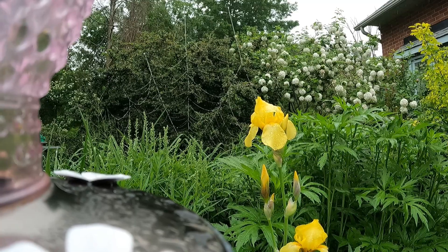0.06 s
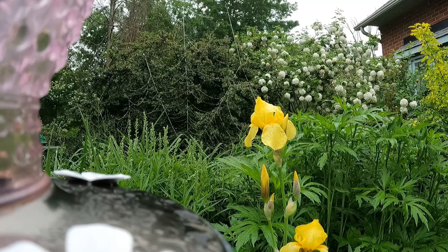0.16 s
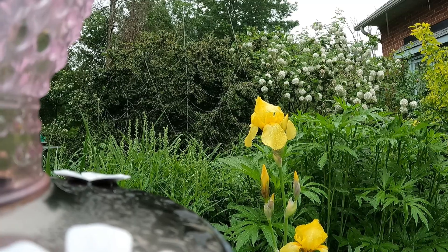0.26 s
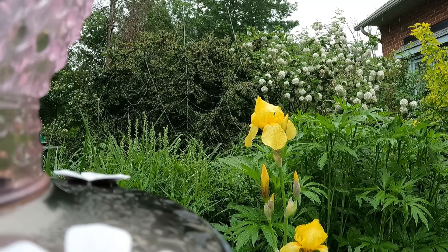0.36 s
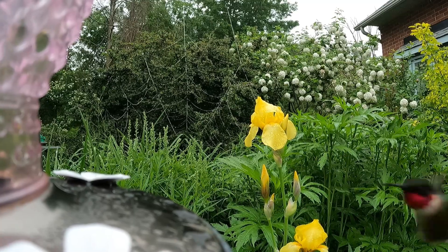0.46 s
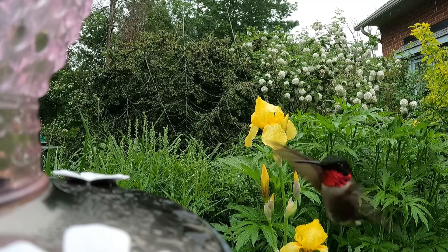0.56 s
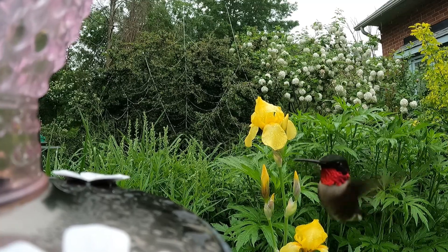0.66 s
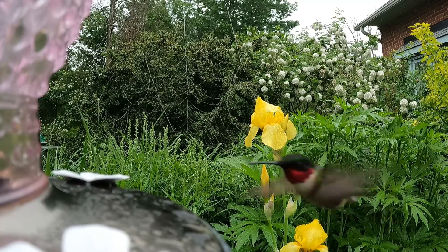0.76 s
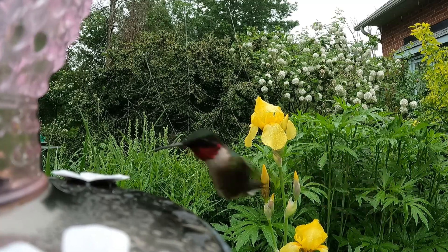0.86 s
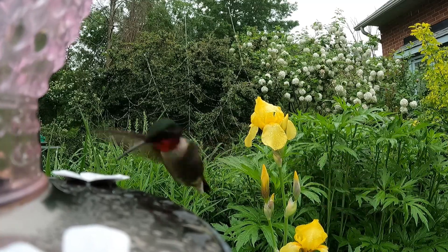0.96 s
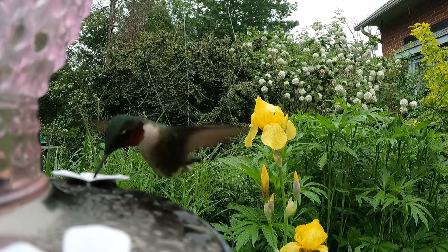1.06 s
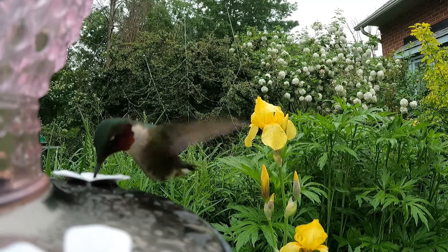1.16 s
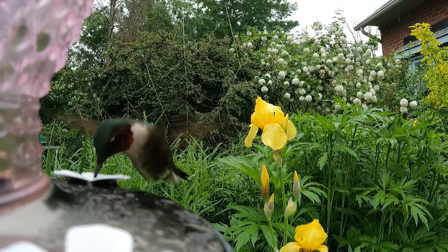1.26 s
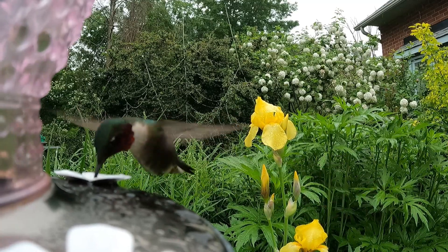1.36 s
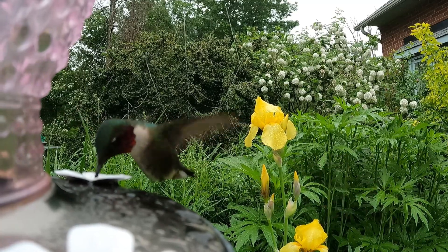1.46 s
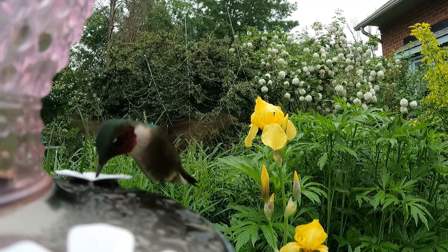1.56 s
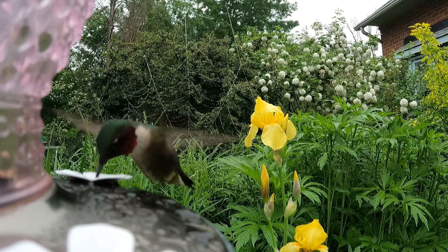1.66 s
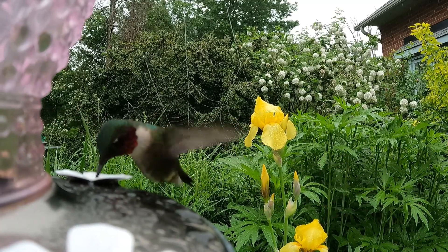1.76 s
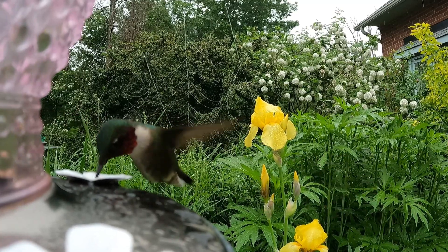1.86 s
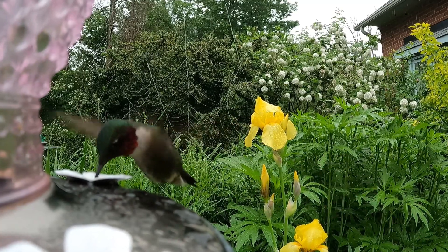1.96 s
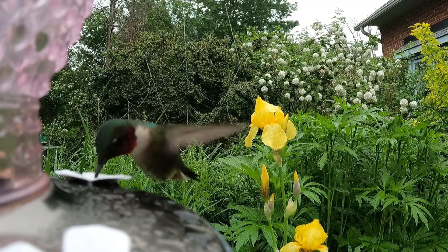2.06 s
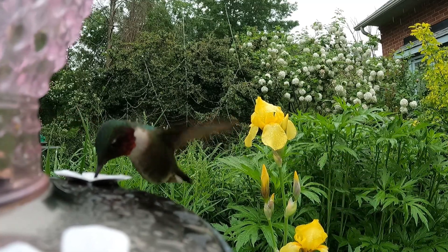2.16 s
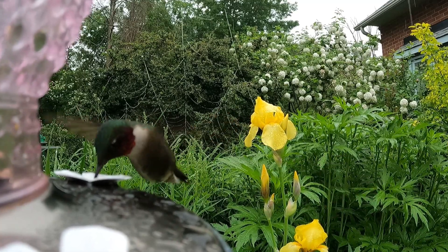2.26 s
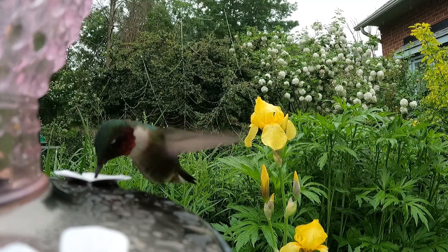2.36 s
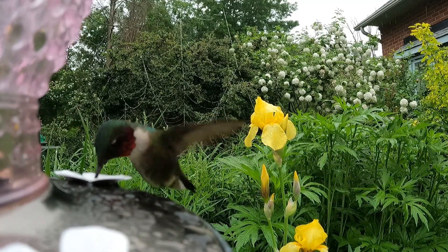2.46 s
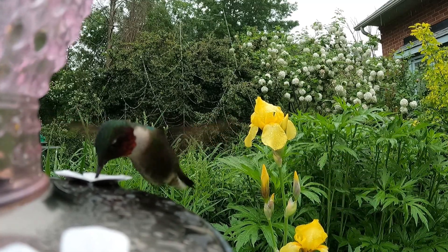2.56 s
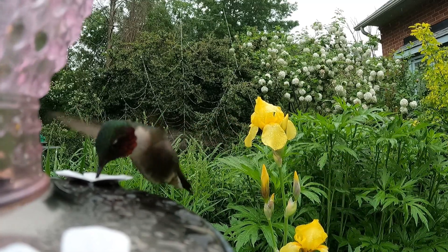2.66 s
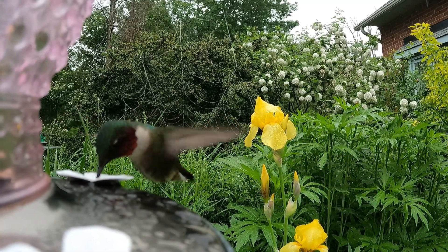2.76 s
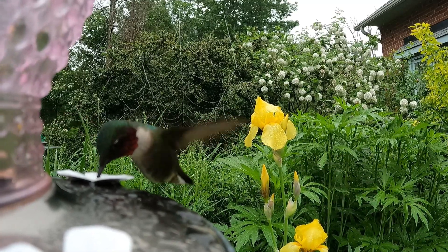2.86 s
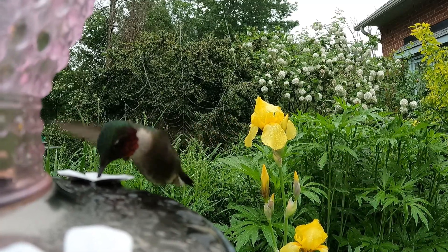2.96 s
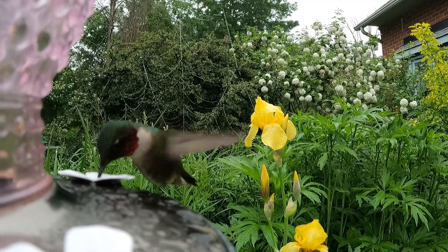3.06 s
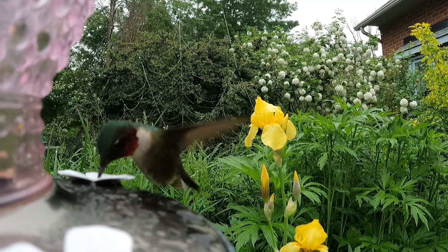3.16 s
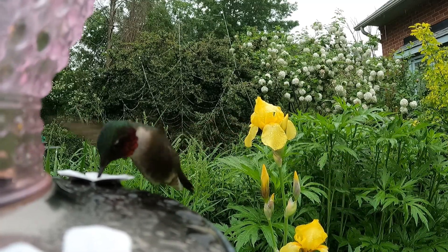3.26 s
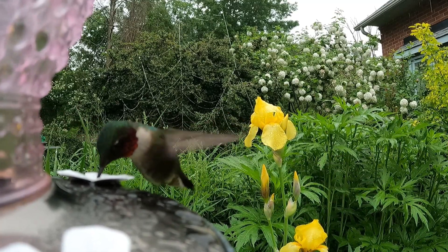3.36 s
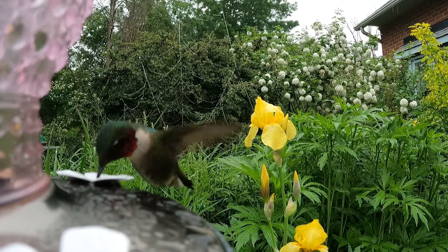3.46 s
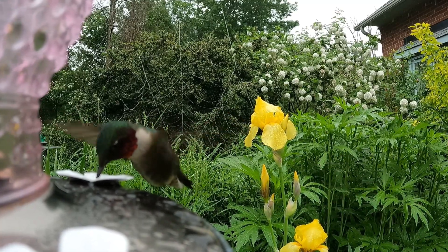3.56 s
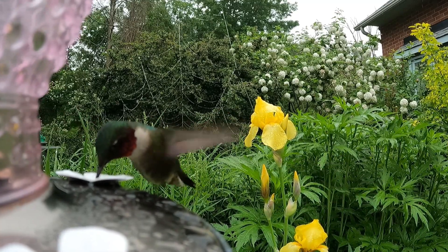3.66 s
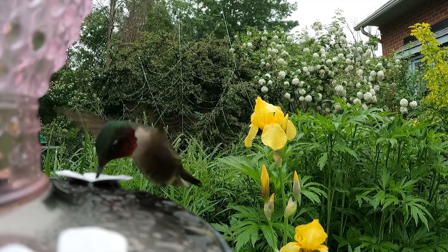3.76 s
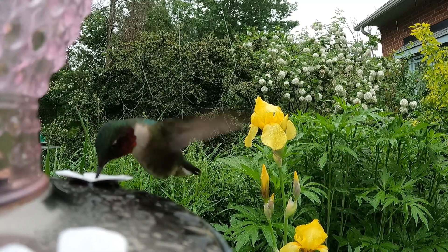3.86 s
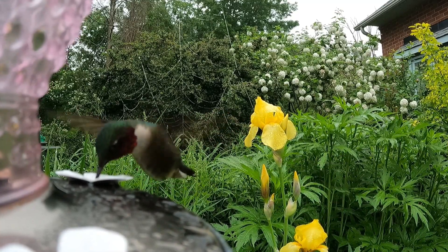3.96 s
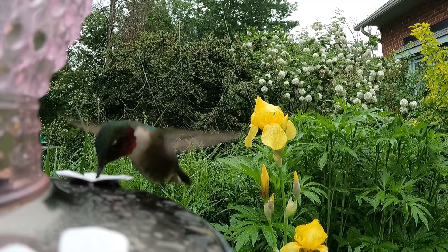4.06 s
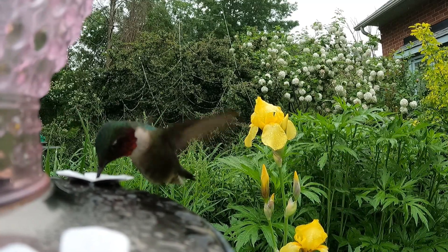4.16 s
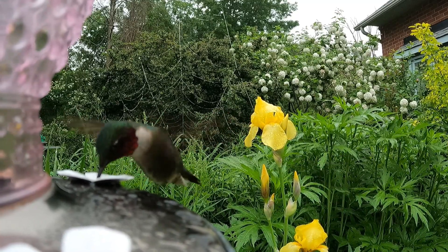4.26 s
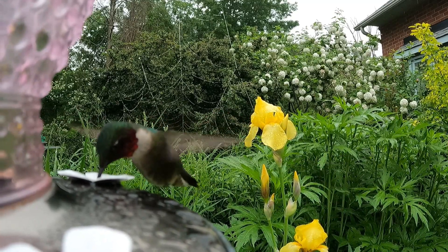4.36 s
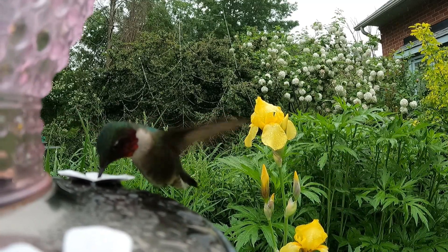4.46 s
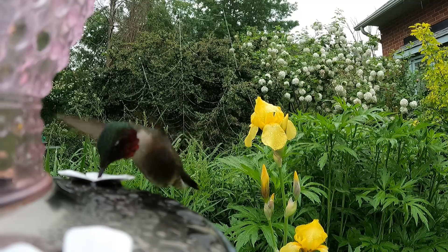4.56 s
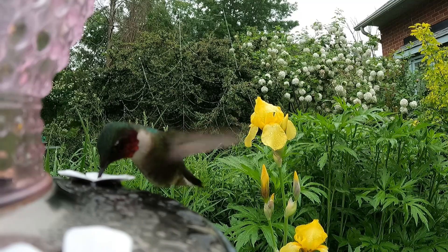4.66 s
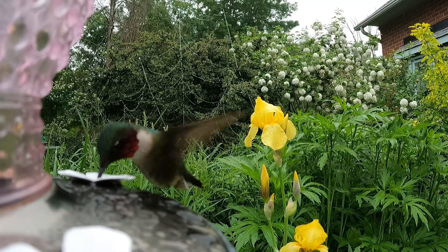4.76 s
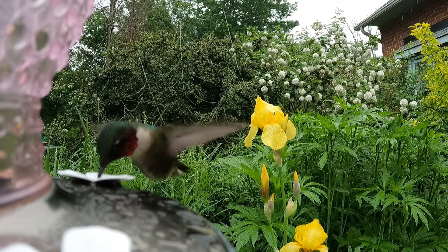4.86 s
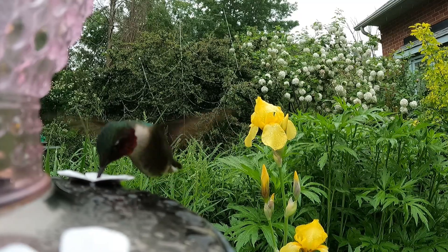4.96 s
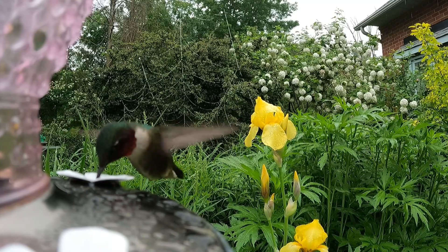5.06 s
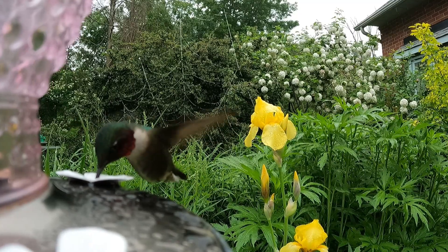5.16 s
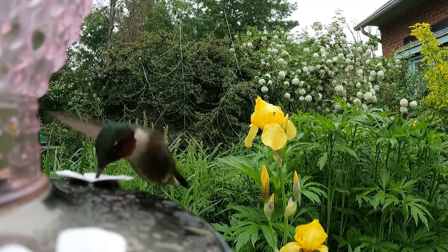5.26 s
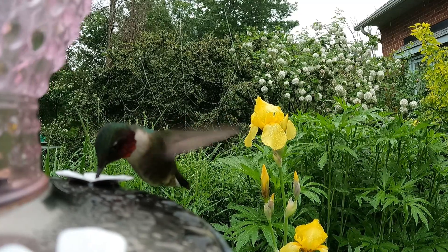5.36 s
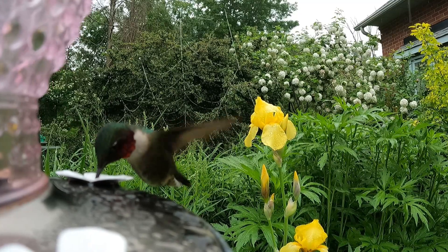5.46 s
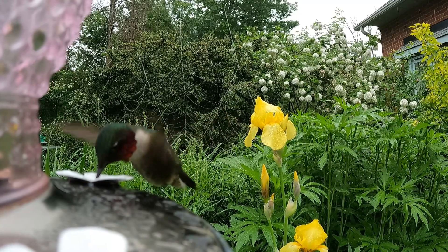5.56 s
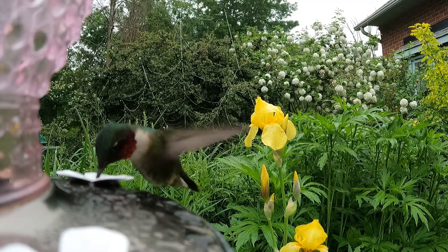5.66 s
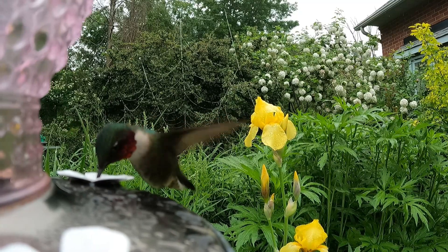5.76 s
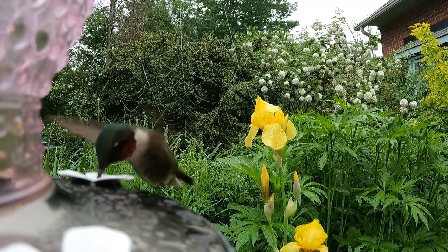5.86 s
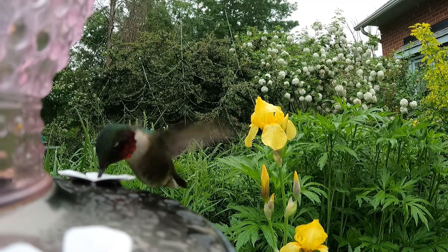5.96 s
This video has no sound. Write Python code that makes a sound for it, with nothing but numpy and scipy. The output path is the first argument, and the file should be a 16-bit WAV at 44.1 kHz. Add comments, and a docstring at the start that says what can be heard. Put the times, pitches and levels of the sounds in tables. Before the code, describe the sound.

The wing hum of a hummingbird is present from the start, fairly soft, around 65 beats a second, with faint far bird whistles between 0.1 and 0.4 s. From about 0.35 to 1.1 s the bird swerves in: the hum jumps in level and colour, thinner then fuller, with low thumps of buffeting air and short whooshes, its pitch rising briefly near 1.1 s. By 1.25 s it is loud and close, leaning right, and holds as a deep, throbbing, slightly uneven drone with a papery feather rustle until 6 s. Tiny dry bill taps come near 1.3, 3.0, 3.9, 4.2, 4.9, 5.2 and 5.9 s. A short hoarse chip sounds near 2.05 s, a fainter one at 4.7 s, and dim distant whistles around 4.5 to 5.2 s. The garden is only a faint, soft hiss behind, and the hum continues to the end without fading.

```python
"""Hummingbird at a garden feeder

A hummingbird flies in and hovers a hand's width from a small stereo camera, its hum leaning right.
Each wingbeat swings the air and sucks it in at the turn of the stroke: harmonics that sum to a pulse.
Air buffets the microphone in shaped noise; short noise bursts are feather snaps and bill ticks.
Gliding tones are small birds far off, and filtered noise is the faint hiss of the garden."""
import sys
import numpy as np
from scipy import signal
from scipy.fft import rfft, irfft, next_fast_len
from scipy.io import wavfile
from scipy.ndimage import uniform_filter1d

SR = 44100
rng = np.random.default_rng(int(sys.argv[2]) if len(sys.argv) > 2 else 0)


def unload_audio(sound):
    """Save the sound as a 16-bit wav file, at the path given as the first command line argument."""
    columns = np.transpose(np.atleast_2d(sound))
    # keep every value between -1 and 1, then stretch to whole-number steps
    steps = np.round(np.clip(columns, -1, 1) * 32767)
    wavfile.write(sys.argv[1], SR, steps.astype(np.int16))


def volts(x):
    """Linear amplitude factor 10**(x/20) for a level x in dB, scalar or array-like."""
    e = np.asarray(x, float) / 20
    return 10 ** e


N = 265482  # length in samples
TURN = 0.3765  # share of the beat at which the overtones add up to the suction pulse


def level(x, db):
    """Scale to an rms level in dB."""
    return x * volts(db) / np.sqrt(np.mean(x ** 2))


def colour(x, points):
    """Shape a spectrum along (Hz, dB) points, straight over log frequency."""
    hz, db = np.transpose(points)
    size = next_fast_len(N)
    f = np.maximum(np.fft.rfftfreq(size, 1 / SR), 1)
    gain = volts(np.interp(np.log(f), np.log(hz), db))
    return irfft(rfft(x, size) * gain, size)[..., :N]


def walk(rate):
    """Random levels held 1 / rate s and slewed twice; spread near 1."""
    k = int(SR / rate)
    held = np.repeat(rng.standard_normal(N // k + 1), k)
    slewed = uniform_filter1d(uniform_filter1d(held, k), k)
    return 1.3 * slewed[:N]


def spread(side_db):
    """Left and right noises that share most of their waveform; more side is wider."""
    mid, side = rng.standard_normal((2, N))
    return mid + volts(side_db) * side * np.array([[1], [-1]])


def place(x, pan_db):
    """Set a sound between left and right; pan_db is left minus right."""
    return x * volts(np.array([pan_db, -pan_db]).reshape(2, -1) / 2)


def burst(seconds, hz, width, noise):
    """A puff of noise cresting after the given seconds, with a click there, in one band; peak 1."""
    n = np.arange(len(noise))
    click = 3 * (n == int(seconds * SR))
    puff = (noise + click) * n * np.exp(-n / SR / seconds)
    band = np.clip([hz - width / 2, hz + width / 2], 300, 16000)
    puff = signal.sosfilt(signal.butter(2, band, "bandpass", fs=SR, output="sos"), puff)
    return puff / np.abs(puff).max()


def garden():
    """Distant leaves and traffic: a low and a high hiss that drift slowly, widest in the treble."""
    # overall colour of the hiss: freq_hz, gain_db
    garden_colour = [(350, -21), (600, 0.5), (830, -9.5), (1100, -3.5), (1310, -3.5), (1860, -4),
                     (2080, -6), (4200, -10.5), (7340, -19.5), (9390, -27), (10400, -35.5), (11700, -34),
                     (13300, -48)]
    low = colour(spread(-7), [(1500, -0.5), (3000, -9.5)]) * volts(0.48 * walk(6.1))
    high = colour(spread(-4.0), [(1500, -10.5), (3000, -4.0), (9000, 0.0), (11000, -15)])
    high = high * volts(0.53 * walk(7.6))
    top = colour(spread(-1.8), [(9000, -24.0), (11000, -2)])
    return level(colour(low + high + top, garden_colour), -53.5)


def birds():
    """Gliding whistles and hoarse chips, with a faint tail from the bushes."""
    # chips of a bird nearby: start_s, level_db
    chips = [(2.053, -42.5), (4.669, -47)]
    # parts of a chip, a short fall, an arch and a low rasp:
    # delay_s, length_s, start_hz, middle_hz, end_hz, level_db against the chip
    chip_voices = [(0, .007, 4300, 4050, 3800, -4), (.004, .013, 3700, 4450, 3800, 0),
                   (-.003, .021, 3500, 3300, 3050, -10)]
    # hoarseness (0-1), left_minus_right_db, left_lag_rad
    chip_seat = (0.57, -2.2, .58)
    # whistles of far birds: start_s, length_s, start_hz, middle_hz, end_hz, level_db
    whistles = [(.138, .03, 1800, 1810, 1810, -58), (.265, 0.075, 3350, 3150, 2830, -54),
                (.292, .079, 2870, 2150, 2060, -58), (.39, .03, 2450, 2430, 2420, -58),
                (4.46, .069, 3200, 2760, 2600, -60), (4.597, 0.076, 2370, 2420, 2240, -58),
                (5.013, .11, 2300, 2400, 2030, -57), (5.158, 0.081, 2880, 2950, 2880, -56)]
    # hoarseness (0-1), left_minus_right_db, left_lag_rad
    whistle_seat = (.45, 4.9, 1.8)

    calls = [(s + late, *shape, db + below_db, *chip_seat)
             for s, db in chips for late, *shape, below_db in chip_voices]
    calls += [(*row, *whistle_seat) for row in whistles]
    out = np.zeros((2, N))
    rasp = walk(1500) + 1j * walk(1500)
    for s, length, *hz, db, hoarse, pan_db, lag in calls:
        i = int(s * SR)
        u = np.arange(int(length * SR)) / (length * SR)  # 0 to 1 through the call
        pitch = np.polyval(np.polyfit([0, .5, 1], hz, deg=2), u)
        tone = np.exp(2j * np.pi * np.cumsum(pitch) / SR)
        voice = (1 + hoarse * rasp[i:i + len(u)]) * tone
        ports = np.real(voice * np.exp(.5j * lag * np.array([[-1], [1]])))
        swell = np.sin(np.pi * u) ** 0.43
        out[:, i:i + len(u)] += volts(db) * place(swell * ports, pan_db)
    t = np.arange(SR // 8) / SR
    bushes = .012 * rng.standard_normal((2, len(t))) * np.exp(-t / .015)
    return out + signal.fftconvolve(out, bushes, axes=1)[:, :N]


def ticks():
    """Dry taps of the bill on the feeder, each with a short rattle."""
    # taps, before their shared colour, with a dip near 10 kHz and a cut treble:
    # start_s, tap_peak_db, centre_hz
    taps = [(1.2918, -26, 4700), (1.2921, -30, 6500), (3.0438, -38, 6000), (3.0461, -33, 6500),
            (3.8563, -37, 9000), (4.198, -29, 4400), (4.875, -26.5, 7000), (4.8812, -37, 7500),
            (5.2195, -32, 10000), (5.9262, -35, 7500)]
    tap_colour = [(1000, -9), (3000, 0.0), (9000, -2.0), (10300, -14), (11800, 0.0),
                  (13500, -20), (15000, -40)]  # (Hz, dB)
    relative_width = 0.97  # bandwidth over centre
    out = np.zeros((2, N + 1024))
    noise = rng.standard_normal((len(taps), 2, 1024))
    for (s, db, hz), (tap_noise, rattle_noise) in zip(taps, noise):
        tap = burst(0.00021, hz, relative_width * hz, tap_noise)
        rattle = burst(0.00097, hz, relative_width * hz, rattle_noise)
        i = int(s * SR)
        out[:, i:i + 1024] += volts(db) * (tap + 0.06 * rattle)
    return colour(out[:, :N], tap_colour)


def swerves(column):
    """Bell-shaped swells of amplitude at the sharp turns in the air."""
    # centre_s, bell_width_s (standard deviation), buffet_db, whoosh_db
    sharp_turns = [(0.38, 0.057, 10.5, -55), (0.552, 0.039, 7.5, -57), (0.649, 0.0089, 4, -52),
                   (0.854, 0.018, 2, -51.5), (.92, 0.018, 2, -70), (1.013, 0.029, -3, -60),
                   (1.063, 0.024, -1, -56), (1.184, 0.0086, -11, -72), (1.36, 0.018, -5, -54)]
    t = np.arange(N) / SR
    return sum(volts(row[column]) * np.exp(-.5 * ((t - row[0]) / row[1]) ** 2) for row in sharp_turns)


def wake(beats, near):
    """Turbulent air buffets the microphone, most at the turn of the stroke; swerves add a broad whoosh."""
    # colour of the buffeting: freq_hz, gain_db
    buffet_colour = [(20, -1), (40, 7), (90, 7.5), (220, 4.5), (400, -5.5), (700, -19.5), (1200, -55.5)]
    # colour of the whoosh: freq_hz, gain_db
    whoosh_colour = [(300, 3), (600, -4), (1400, 1.5), (2500, -13), (5000, -3), (7000, -26), (10000, -38)]
    gust = 1 + 1.3 * np.cos(2 * np.pi * (beats - TURN))
    buffet = level(colour(gust * rng.standard_normal(N), buffet_colour), -8)
    buffet = buffet * near * volts(1.2 * walk(12))
    whoosh = level(colour(gust ** 2 * spread(-18), whoosh_colour), 0)
    return place(buffet * (1 + swerves(column=2)), -3) + whoosh * swerves(column=3)


def feathers(beats, gain_db):
    """A snap of its own size and colour at the reversals of every beat, over a thin rustle."""
    # snaps: share of the beat, relative_level_db, scatter_db, time_to_crest_ms, mean_centre_hz, width_hz
    snaps = [(.53, 4, 1.9, .18, 6200, 5500), (.09, -5.5, 3.2, .5, 3900, 3500),
             (.53, -11, 2.5, .9, 1500, 1600)]
    # colour of snaps and rustle together: freq_hz, gain_db
    feather_colour = [(410, -29), (700, -4), (1000, -3), (1060, -4.5), (1580, -4), (2460, -13),
                      (3040, -8.5), (3790, -12.5), (4340, -9), (6060, -13), (7650, -12.5), (9100, -18),
                      (10200, -23), (11900, -24), (13300, -36)]
    out = 0.5 * spread(-8) * volts(1.2 * walk(40))  # the rustle
    for share, db, scatter_db, ms, hz, width in snaps:
        starts = np.flatnonzero(np.diff(np.floor(beats - share)))
        luck = rng.standard_normal((500, 4))
        noise = rng.standard_normal((500, 256))
        for i, (size, tint, late, side), puff in zip(starts, luck, noise):
            i = int(np.clip(i + 8 * late, 0, N - 256))
            snap = burst(ms / 1000, hz * np.exp(0.17 * tint), width, puff)
            snap_gain = volts(db + 9.5 + scatter_db * size)
            out[:, i:i + 256] += snap_gain * place(snap, 1.1 + 1.5 * side)
    return level(colour(out, feather_colour), 8.5) * volts(gain_db)


def radiation(t, hz):
    """Each order is heard from two directions of push; the bearing mixes them, with sign."""
    # the bird's path: time_s, hum_level_db at the resting beat rate,
    # bearing_deg before sway (0 faces the swing of the stroke, -90 the downwash)
    flight = [(0, -36, 1), (.12, -36.5, -15), (.18, -37.5, -9), (.32, -40.5, -20), (.37, -36, -64),
              (.42, -30, -86), (.45, -34, -103), (.485, -38, -56), (.51, -33, -75), (.55, -30, -37),
              (.59, -30, -1), (.635, -27, -1), (.665, -24.5, 13), (.71, -31, 11), (.735, -30, -34),
              (.78, -30.5, -26), (.81, -30.5, -11), (.87, -26, -47), (.9, -29, -59), (.935, -32.5, -9),
              (.97, -28.5, 8), (1.03, -31, 8), (1.09, -30.5, -19.5), (1.16, -26.5, 20.5), (1.25, -22.5, 23),
              (1.4, -24, 18.5), (1.7, -23, 15), (3.0, -23.5, 14.5), (3.8, -23.5, 16), (3.9, -23, 21),
              (4.08, -23, 17.5), (4.5, -23, 20), (4.82, -24, 17.5), (4.95, -22.5, 17), (5.08, -24.5, 16),
              (6.02, -23.5, 17.5)]
    # orders 1 to 6 against the hum level: swing_db, downwash_db
    pushes = [(0.5, -38), (-35.5, 1), (-8, -21), (-15.5, -16.5), (-20.5, -22.5), (-34.5, -17)]
    # bearings over which the lateness of the pulse fades out: full_deg, none_deg
    lag_bearings = (0, 11)
    turn_lag = 0.042  # share of a beat by which the pulse comes late at low bearings
    rest_hz, effort_db_per_hz = 63, 0.45  # faster beats are louder
    # the bass push fades fastest with distance:
    # dB gained by the odd orders from 5 up per dB of hum level lost against the hover
    hover_db, far_brighter = -23, 0.31

    s, path_db, path_deg = np.transpose(flight)
    db = np.interp(t, s, path_db) + effort_db_per_hz * (hz - rest_hz)
    deg = np.interp(t, s, path_deg)
    late = np.exp(-2j * np.pi * np.interp(deg, lag_bearings, [turn_lag, 0]))
    bearing = np.radians(deg + 0.5 * walk(9.7))  # the hover sways
    orders = []
    for k, (swing_db, down_db) in enumerate(pushes, start=1):
        swing = volts(swing_db) * np.cos(bearing)
        downwash = volts(down_db) * np.sin(bearing) * (-1j if k % 2 else 1)
        gain = volts(db + far_brighter * (hover_db - db) * (k == 5))  # orders 7, 9, 11 derive from 5
        orders.append(gain * late ** (k * (k > 2)) * (swing + downwash))
    return orders


def wings(beats, orders):
    """The swing of the stroke, and overtones that meet in a suction pulse; no two beats quite alike."""
    # orders 7 to 12: level_db against order 5 or 6, whichever has the same parity
    upper_drop_db = [-11.5, -10, -22, -20, -30.5, -26.5]
    sharper = 1 + 0.31 * swerves(column=2)  # swerves brighten order 3 and up, the top most
    orders = orders + [orders[4 + k % 2] * volts(drop_db) * sharper
                       for k, drop_db in enumerate(upper_drop_db)]
    swing = np.real(orders[0] * np.exp(2j * np.pi * beats))
    out = place(volts(.25 * walk(29.74)) * swing, -2.6)
    # each turn comes a little early or late, soft or sharp
    turn, snap_db = TURN + .002 * walk(40), walk(60)
    for k, order in enumerate(orders[1:], start=2):
        lead = np.pi / 2 * (k > 5)  # the highest orders steepen the front of the pulse
        phase = 2 * np.pi * k * (beats - turn) + lead + np.angle(order) + 0.024 * k * walk(25)
        ports = np.cos(phase + 0.012 * k * np.array([[1], [-1]]))
        # higher orders vary more: shared sharpness, own flicker, slow drift
        vary_db = 0.09 * k * snap_db + 0.037 * k * walk(24.76) + 0.2244 * k * walk(10)
        strength = np.abs(order) * volts(vary_db) * sharper ** (0.26 * (2 < k < 7))
        out -= strength * place(ports, -2.2 - 0.53 * k)
    return np.sqrt(2) * out


def scene():
    """The bird's hum to the right of the camera, garden all around."""
    # wingbeat rate: time_s, beat_hz
    beat_rate = [(0.0, 67.67), (0.12, 65.5), (0.24, 68.85), (0.48, 62.61), (0.81, 67.02), (0.9, 64.15),
                 (0.99, 67.3), (1.05, 72.01), (1.11, 73.11), (1.19, 66.23), (1.48, 63.21), (1.87, 62.72),
                 (2.33, 63.05), (2.39, 63.49), (2.82, 62.2), (3.02, 63.39), (3.53, 62.84), (3.59, 63.1),
                 (3.94, 65.93), (4.16, 62.95), (4.68, 63.97), (4.75, 62.89), (4.94, 65.49), (5.25, 64.09),
                 (5.43, 62.93), (6.02, 63.69)]
    # feathers along the flight: time_s, gain_db
    feather_gain = [(0, -68), (.36, -72.5), (.54, -63.5), (.63, -60.5), (.7, -62.5), (1.08, -63.5),
                    (1.3, -64), (2.3, -62.5), (6.02, -63)]
    t = np.arange(N) / SR
    hz = np.interp(t, *np.transpose(beat_rate))
    beats = .234 + np.cumsum(hz) / SR  # wingbeats so far
    orders = radiation(t, hz)
    hum = wings(beats, orders) + wake(beats, np.abs(orders[2]))
    rustle = feathers(beats, np.interp(t, *np.transpose(feather_gain)))
    return hum + rustle + ticks() + birds() + garden()


def low_pass(x):
    """Removes everything above the highest recorded frequency."""
    return signal.sosfilt(signal.butter(12, 13480, fs=SR, output="sos"), x)


def record(dry):
    """The microphone port dips near 10 kHz."""
    notch = [(9700, -0.5), (10350, -6.5), (10900, 1)]  # (Hz, dB)
    heard = colour(dry, notch)
    return low_pass(heard)


dry = scene()
out = record(dry)
unload_audio(out)
```